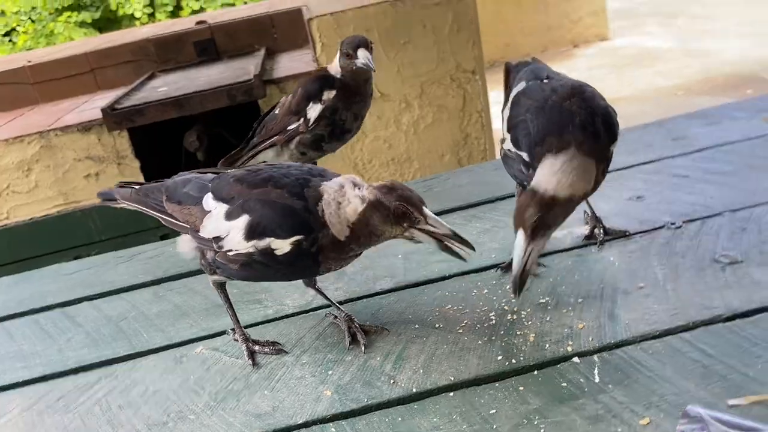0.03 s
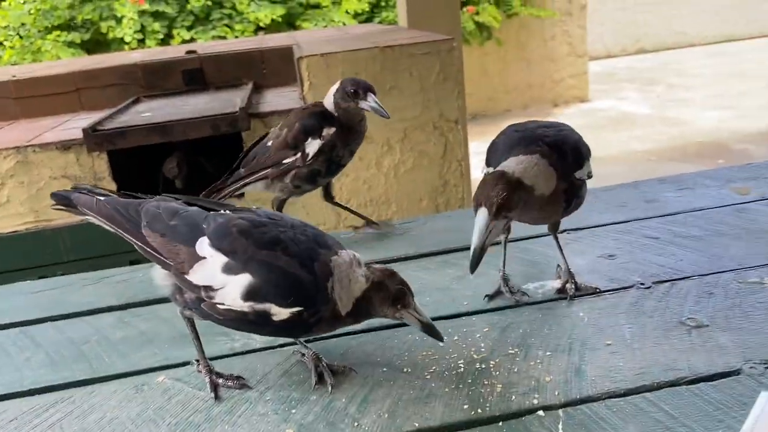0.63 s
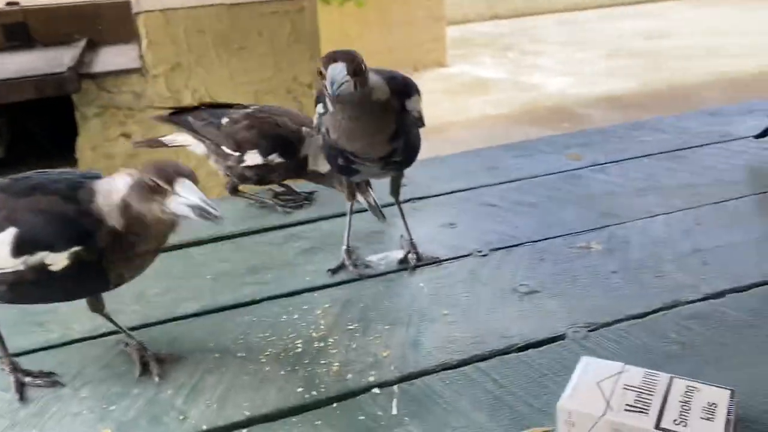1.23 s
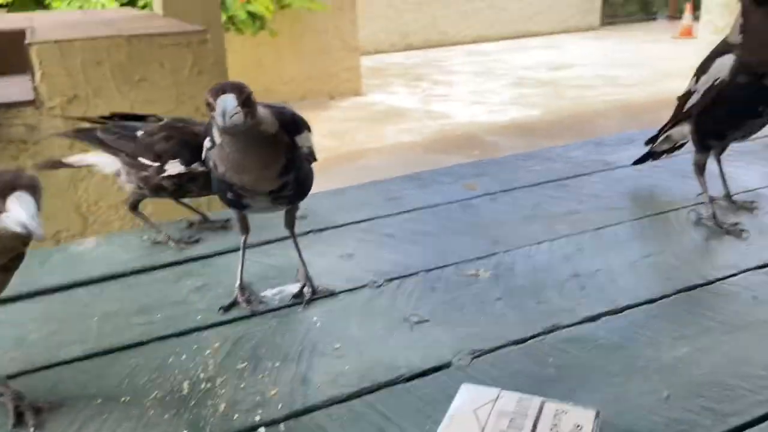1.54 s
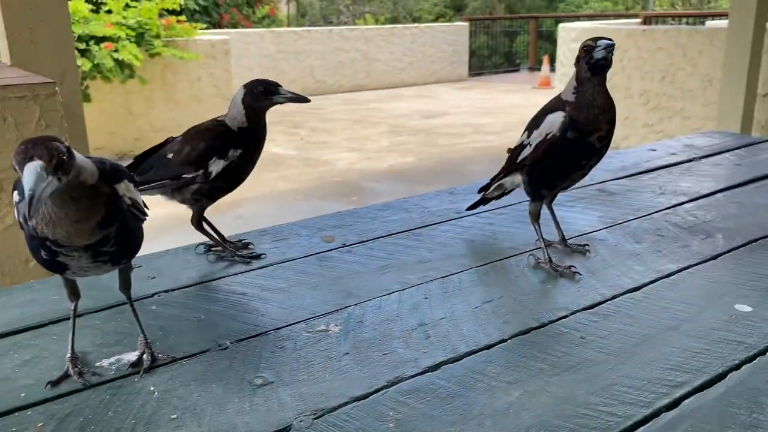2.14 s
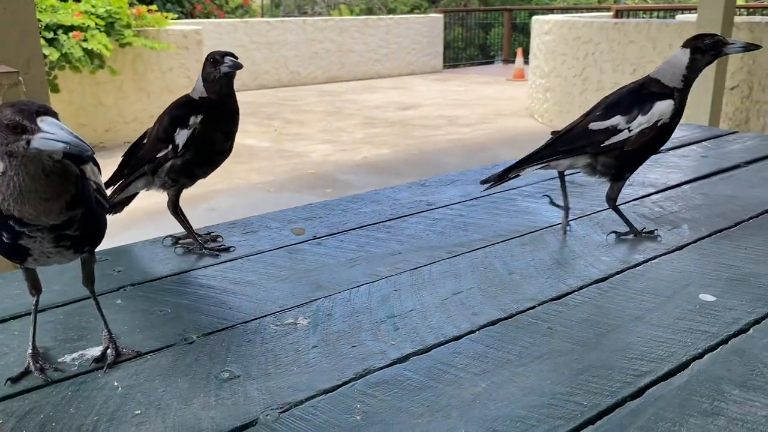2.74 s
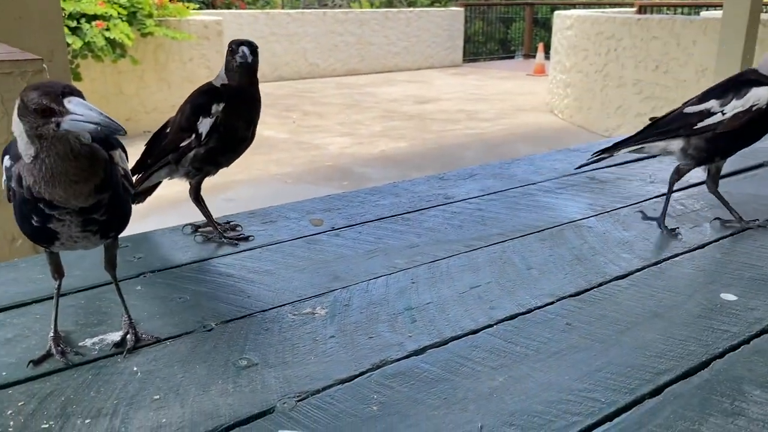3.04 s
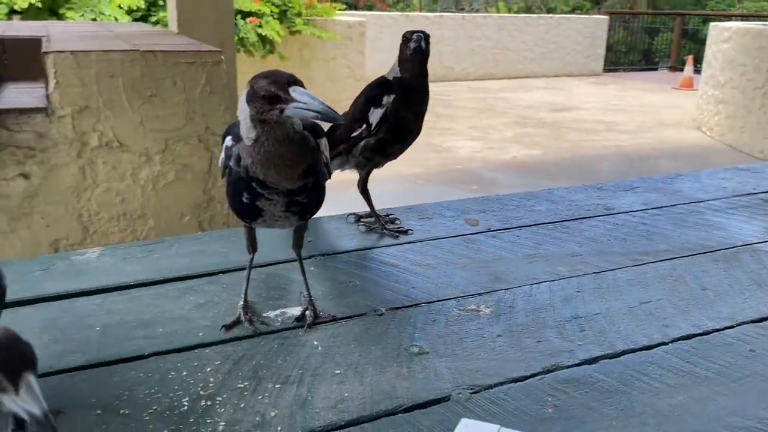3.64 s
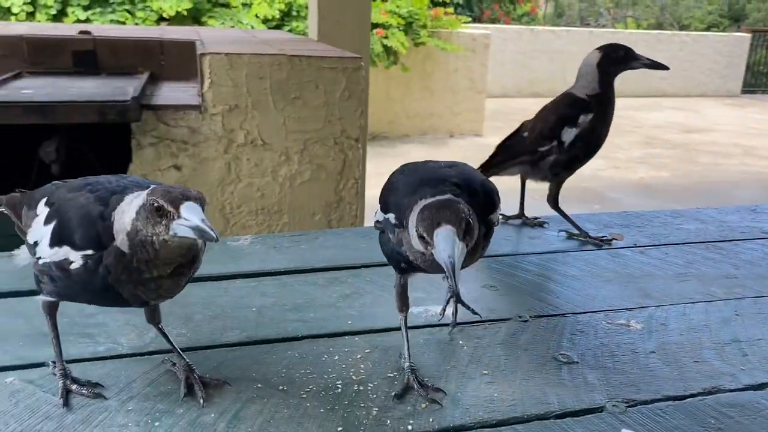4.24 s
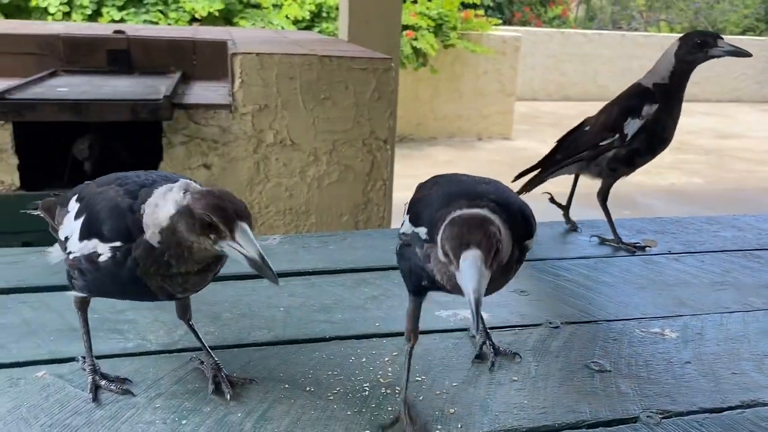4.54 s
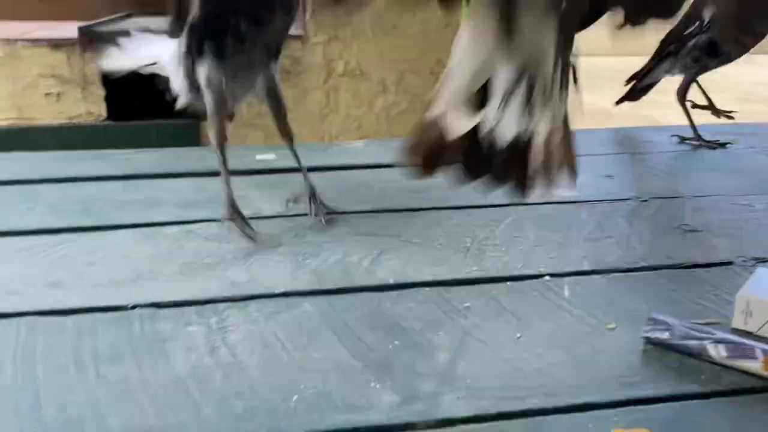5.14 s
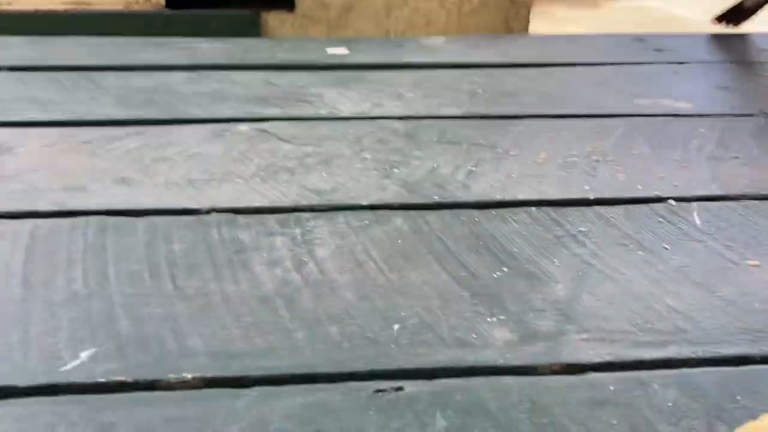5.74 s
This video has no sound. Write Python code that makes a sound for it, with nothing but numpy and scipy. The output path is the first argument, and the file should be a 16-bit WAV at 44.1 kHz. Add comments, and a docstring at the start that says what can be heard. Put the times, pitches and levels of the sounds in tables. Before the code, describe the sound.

Light pecks click on a wooden table on a quiet veranda as young magpies call nearby in bending, nasal whines, some led by a throaty rasp. Fainter answers and a few soft fluting notes come from a distance. Then a brief squabble breaks out against the microphone, with brushing feathers and two ragged screeches, followed by the swish and low thumps of departing wings.

```python
"""On a veranda, young magpies peck crumbs off a wooden table near the microphone and beg with nasal,
arching whines and low rasps, pulses of the syrinx ringing in the throat. Farther off a bird answers,
and faint fluting notes follow. At about five seconds they squabble: feathers rustle and two harsh
squawks burst out right at the microphone. Then wing beats buffet it as the birds take off."""
import sys
import numpy as np
from scipy import signal
from scipy.fft import rfft, irfft
from scipy.io import wavfile
from scipy.ndimage import uniform_filter1d

SR = 44100
rng = np.random.default_rng(int(sys.argv[2]) if len(sys.argv) > 2 else 0)


def transcribe(u):
    """Save the signal u as a 16-bit wav file named by the first command-line argument.

    u: samples, shape (n,) or (channels, n), limited to [-1, 1]; the rate is SR.
    q: integer samples, one column per channel.
    """
    v = np.clip(np.atleast_2d(u).T, -1, 1)
    q = np.round(v * 32767).astype(np.int16)
    wavfile.write(sys.argv[1], SR, q)


N = 263718
T = np.arange(N) / SR
HZ = np.maximum(np.fft.rfftfreq(N, 1 / SR), 1)
TAKE_OFF_S = 5.24


def from_db(db):
    """Decibels to gain."""
    return 10 ** (np.asarray(db) / 20)


def rms_one(x):
    """Scale to unit power."""
    return x / np.sqrt(np.mean(x ** 2) + 1e-20)


def pan(db):
    """Channel gains that put the left db above the right."""
    return from_db(np.array([[db], [-db]]) / 2)


def add(out, s, sound):
    """Mix a sound in at s seconds."""
    i = round(s * SR)
    sound, i = sound[..., max(-i, 0):], max(i, 0)
    out[:, i:i + sound.shape[-1]] += sound[..., :N - i]


def band(x, low_hz, high_hz, order=2):
    """Butterworth band-pass."""
    return signal.sosfilt(signal.butter(order, [low_hz, high_hz], "band", fs=SR, output="sos"), x)


def drift(hz, size):
    """A random wander of spread near 1, up to about hz."""
    knots = rng.standard_normal(int(size * 2 * hz / SR) + 3)
    return np.interp(np.arange(size) * 2 * hz / SR, np.arange(len(knots)), knots)


def resonance(x, hz, width_hz):
    """Two-pole resonance with gain 1 on top."""
    r = np.exp(-np.pi * width_hz / SR)
    poles = [1, -2 * r * np.cos(2 * np.pi * hz / SR), r * r]
    return signal.lfilter(np.array([1, 0, -1]) * (1 - r * r) / 2, poles, x)


def stereo_noise(size, side_db):
    """White noise; the lower side_db, the narrower the image."""
    mid, side = rng.standard_normal((2, size))
    return mid + from_db(side_db) * side * [[1], [-1]]


def coloured(spectrum, side_db):
    """Stereo noise of unit power with a given spectrum."""
    hz, db = np.transpose(spectrum)
    gain = from_db(np.interp(np.log(HZ), np.log(hz), db, left=-90, right=-90))
    return rms_one(irfft(rfft(stereo_noise(N, side_db)) * gain, N))


def at_ports(x, phases):
    """Close sounds reach the microphone's two ports out of step."""
    hz, radians = np.transpose(phases)
    lead = np.interp(np.log(HZ), np.log(hz), radians)
    return irfft(rfft(x) * np.exp(.5j * lead * [[1], [-1]]), N)


def gate(t, fade_s):
    """Soft ends for a call."""
    return np.clip(np.minimum(t, t[-1] - t) / fade_s, 0, 1)


def envelope(t, attack_s, release_s, swell_db=16, fade_db=16.5, bend=2.28):
    """Attack, hold and release, in dB relative to the call's level."""
    rising = np.clip(1 - t / attack_s, 0, 1)
    falling = np.clip(1 - (t[-1] - t) / release_s, 0, 1)
    return -swell_db * rising ** bend - fade_db * falling ** 1.56


# ambience beyond the veranda, before its gains: (time [s], rumble [dB], hiss [dB])
AMBIENCE = [(0.0, -53.5, -66), (0.2, -55.5, -80), (1.78, -67.5, -76.5), (2.63, -68, -83), (3.26, -74, -85),
            (4.6, -73, -79), (5.08, -61, -74), (5.23, -60, -84), (5.46, -62, -71), (5.59, -53.5, -72.5),
            (5.98, -54.5, -87)]
# spectra of its three layers: (frequency [Hz], level [dB])
RUMBLE_SPECTRUM = [(15, -47), (25, -13), (39, -24), (54, 8), (87, -2), (163, -2), (345, -7.5), (394, -13),
                   (450, -11.5), (580, -48), (990, -120)]
AIR_SPECTRUM = [(180, -4.5), (300, -5), (686, -5.5), (804, -3), (1320, -6.5), (1820, -14), (2400, -12.5),
                (2720, -17), (3300, -19), (5500, -28), (7150, -62), (12100, -120)]
HISS_SPECTRUM = [(4000, -37), (6200, -16), (7300, -1.5), (8200, -12.5), (10000, -18), (12000, -12),
                 (16000, -69.5)]
def outdoors(rumble_gain_db=2.0, hiss_gain_db=4.5, air_db=-65, air_follows=0.56):
    """Low rumble, distant air that rises and falls with it, and a thin hiss."""
    times, *levels = np.transpose(AMBIENCE)
    rumble_db, hiss_db = (np.interp(T, times, db) for db in levels)
    rumble = from_db(rumble_db + rumble_gain_db) * coloured(RUMBLE_SPECTRUM, side_db=-14.5)
    swing_db = rumble_db - rumble_db.mean()
    air = from_db(air_db + air_follows * swing_db) * coloured(AIR_SPECTRUM, side_db=0)
    hiss = from_db(hiss_db + hiss_gain_db) * coloured(HISS_SPECTRUM, side_db=-6.5)
    return rumble + air + hiss


def veranda(x, t60_s, split_hz=5000):
    """Dense reflections from the roof and walls around the microphone; the treble dies sooner."""
    t = T[:SR]
    noise = stereo_noise(len(t), side_db=-3.5)
    body = band(noise, 200, split_hz) * from_db(-60 * t / t60_s)
    treble = 0.28 * band(noise, split_hz, 9300) * from_db(-130 * t / t60_s)
    tail = (body + treble) * np.clip(t / 0.0025 - .4, 0, 1)
    return signal.fftconvolve(x, tail / np.sqrt(np.sum(tail ** 2) / 2), axes=1)[:, :N]


def arch(t, top_hz, scoop, top_at=.71, droop=0.0316):
    """The pitch of a whine scoops up to its top and droops a little."""
    progress = t / t[-1]
    before = np.maximum(1 - progress / top_at, 0)
    after = np.maximum((progress - top_at) / (1 - top_at), 0)
    return top_hz * (1 - scoop * before ** 1.9 - droop * after ** 2)


def whine(t, pitch_hz, db, beak, rough, jitter=0.0066, shimmer_db=2.5, breath=0.03):
    """Harmonics on one wavering pitch, shaped by the beak; the note starts hoarse and clears."""
    hoarse = rough + 0.51 * np.linspace(1, 0, len(t)) ** 2
    waver = 1 + jitter * drift(30, len(t)) + .12 * hoarse ** 2 * drift(160, len(t))
    phase = 2 * np.pi * np.cumsum(pitch_hz * waver) / SR
    dull_db = (db.max() - db) / 40   # less effort gives a duller tone
    voice = 0
    for k in range(1, 18):
        rolloff_db = 1.34 * max(k - beak[-1][0], 0)
        level = np.interp(k, *np.transpose(beak)) - rolloff_db - k * dull_db
        flutter = 1 + hoarse * drift(91, len(t))
        gain = from_db(level + shimmer_db * drift(15.1, len(t))) * flutter
        voice += gain * np.sin(k * phase + rng.uniform(0, 2 * np.pi))
    hiss = rms_one(band(rng.standard_normal(len(t)) * (1 + np.cos(phase)), 1000, 6000))
    airy = np.clip(.6 * hoarse ** 1.4, 0, .5)
    call = np.sqrt(1 - airy ** 2) * rms_one(voice) + (airy + breath * hoarse) * hiss
    return call * from_db(db) * gate(t, fade_s=0.002)


# distant fluting notes: (time [s], length [s], first pitch [Hz], last pitch [Hz], level [dB])
WARBLES = [(2.6, 0.21, 1000, 870, -77.5), (3.3, 0.11, 700, 862, -72), (3.41, 0.095, 975, 741, -68)]
# their timbre: (harmonic [number], level [dB])
WARBLE_BEAK = [(1, -1), (2, -10), (3, -28), (5, -45)]
def warbles():
    """Far from the microphone, soft fluting notes slide evenly in pitch."""
    out = np.zeros((2, N))
    for s, length, first_hz, last_hz, db in WARBLES:
        t = T[T < length]
        pitch = np.linspace(first_hz, last_hz, len(t))
        level = db + envelope(t, attack_s=0.061, release_s=.02)
        add(out, s, whine(t, pitch, level, WARBLE_BEAK, rough=.24, jitter=0.027))
    return out


# answering whines: (time [s], length [s], top pitch [Hz], level [dB])
ANSWERS = [(0.717, 0.22, 932, -60.5), (1.657, 0.14, 900, -60.5), (3.568, .16, 937, -67.5)]
# their timbre: (harmonic [number], level [dB])
ANSWER_BEAK = [(1, -9), (2, 3), (3, -1.5), (4, -8.5), (5, -5), (6, -14.5), (8, -35), (12, -55)]
def answers():
    """A bird farther off, a little to the left, answers on a higher note."""
    out = np.zeros((2, N))
    for s, length, top_hz, db in ANSWERS:
        t = T[T < length]
        level = db + envelope(t, attack_s=0.047, release_s=0.05)
        add(out, s, whine(t, arch(t, top_hz, scoop=0.098), level, ANSWER_BEAK, rough=0.17))
    return out * pan(db=3)


# beaks and claws on the table; harder means more tick, less knock: (time [s], level [dB], hardness [dB])
PECKS = [(.302, -49, -9.5), (.541, -49, 2.5), (.821, -46.5, -4), (.831, -42, -5.5), (.841, -47, -8),
         (1.168, -50, 1.5), (1.189, -51, -1), (1.199, -53.5, -9), (1.436, -52, 0.5), (1.635, -58, 3),
         (1.948, -56.5, -1), (2.958, -43.5, -2.5), (3.558, -55, -0.5), (4.043, -55, 2), (4.299, -54, 2.5),
         (4.525, -62.5, 6), (4.811, -48.5, 2.5)]
# modes of a table board: (frequency [Hz], t60 [s], level [dB])
BOARD_MODES = [(693, 0.053, -9), (916, 0.056, -2), (1042, 0.051, -7.5), (1340, 0.018, -1), (1660, 0.02, -7),
               (1990, 0.018, -3.5)]
def pecks(knock_db=-4.5, crack_db=-5.5, tick_db=4, step_count=33, step_db=-65, step_hardness_db=1):
    """A hard tip clicks on a board and sets it ringing; faint claw steps fall at random until take-off."""
    out, t = np.zeros((2, N)), T[:SR // 8]
    steps = [(rng.uniform(0, TAKE_OFF_S), step_db, step_hardness_db) for _ in range(step_count)]
    for s, level, hardness in PECKS + steps:
        wood = 0
        for hz, t60, db in BOARD_MODES:
            mode = np.sin(2 * np.pi * hz * rng.normal(1, 0.042) * t) * rng.choice([-1, 1])
            wood += from_db(db - 60 * t / t60) * mode
        crack = rms_one(band(stereo_noise(len(t), side_db=-6.5), 1600, 4400)) * np.exp(-t / 0.0036)
        tick = rms_one(band(stereo_noise(len(t), side_db=1.5), 7300, 13800)) * np.exp(-t / 0.0024)
        click = from_db(crack_db) * crack + from_db(tick_db + hardness) * tick
        add(out, s, from_db(level) * (from_db(knock_db - hardness) * wood + click))
    return out


# two soft low thumps, then air on the microphone from wing strokes: (time [s], level [dB], width [s])
GUSTS = [(2.565, -55.5, .027), (2.66, -60, .02), (5.12, -35.5, 0.016), (5.185, -20, 0.0042),
         (5.446, -31.5, .006), (5.474, -29, 0.021), (5.545, -34.5, 0.006), (5.6, -39.5, 0.015),
         (5.651, -34.5, 0.0064), (5.723, -32.5, 0.007), (5.762, -31, .017), (5.89, -42, 0.011)]
def gusts(wake_lag_s=0.0167, wake_db=-10, wake_stretch=2.3):
    """Two soft low thumps sound, then lumps of turbulent air pass over the microphone; each trails a weaker,
    longer wake."""
    out, t = np.zeros((2, N)), T[:SR // 4]
    middle = t[-1] / 2
    wakes = [(s + wake_lag_s, db + wake_db, width * wake_stretch) for s, db, width in GUSTS]
    for s, db, width in GUSTS + wakes:
        top_hz = 314 * 2 ** ((db + 30) / 12)   # an octave brighter for each 12 dB
        swell = np.exp(-((t - middle) / width) ** 2 / 2)
        puff = band(stereo_noise(len(t), side_db=-20.5), 0.17 * top_hz, top_hz, order=3) * swell
        add(out, s - middle, from_db(db) * rms_one(puff) * np.sqrt(np.mean(swell ** 2)))
    return out * pan(db=-1)


# air around the wings: (frequency [Hz], level [dB])
SWISH_SPECTRUM = [(290, -49), (500, -37), (766, -1.5), (832, -6), (1080, -1), (1460, -13), (2350, -8.5),
                  (2560, -11), (3250, -16), (4920, -19.5), (6000, -20.5), (7800, -19), (13200, -120)]
def flight(db=-59.5, swell_db=7, flutter_db=2.1, pass_s=5.51, pass_width_s=0.076):
    """Air swishes from take-off on and swells as the birds pass the microphone."""
    passing = np.exp(-((T - pass_s) / pass_width_s) ** 2 / 2)
    airborne = np.clip((T - TAKE_OFF_S) / .03, 0, 1)
    level = db + swell_db * passing + flutter_db * drift(40, N)
    return from_db(level) * airborne * coloured(SWISH_SPECTRUM, side_db=-6.5)


# brushing feathers: (peak time [s], level [dB], rise [s], decay [s])
FLURRIES = [(4.96, -35.5, 0.013, 0.09), (5.07, -37, 0.094, 0.047), (5.169, -38.5, 0.0045, 0.017),
            (5.5, -47.5, 0.25, 0.77)]
# wing tips and claws: (time [s], level [dB], decay [s])
FLICKS = [(4.907, -37.5, 0.0099), (4.946, -35.5, 0.015), (5.044, -28, 0.0063), (5.0784, -22, 0.0019),
          (5.0905, -37, 0.0017), (5.554, -22, 0.014)]
# spectrum of both: (frequency [Hz], level [dB])
FEATHER_SPECTRUM = [(880, -5.5), (1500, -15), (4970, -5), (6370, -6.5), (7760, -4), (9010, 16), (9750, -1),
                    (11300, 5.5), (12900, -2), (14900, 1), (16000, 5)]
# port phase of sounds right at the microphone: (frequency [Hz], left lead [rad])
CLOSE_PHASE = [(90, 0), (250, -1.5), (550, -2.17), (1100, -1.03), (3000, -1.1), (6000, -1.1), (11000, -1.9),
               (16000, -2.2)]
def feathers(grain_db=2.5, clump_db=2.0):
    """Right at the microphone, feather barbs rub in grains, wing tips flick and claws scratch."""
    flurries = sum(from_db(db) * np.exp(-np.maximum((s - T) / rise, (T - s) / decay))
                   for s, db, rise, decay in FLURRIES)
    grains = from_db(grain_db * drift(230, N) + clump_db * drift(25, N))
    rustle = flurries * grains * (T > FLICKS[0][0])
    flicks = sum(from_db(db) * np.exp(-np.abs(T - s) / decay) * (T >= s) for s, db, decay in FLICKS)
    return at_ports((rustle + flicks) * coloured(FEATHER_SPECTRUM, side_db=-23), CLOSE_PHASE)


def croak(t, rate_hz, db, throat, jitter, puff_s, puff_share, even_s, throb, uneven_db=2.5):
    """Uneven slaps of the syrinx, each with a puff of air, ring in the throat."""
    cycles = np.cumsum(rate_hz * np.exp(jitter * drift(70, len(t)))) / SR
    slaps = np.diff(np.floor(cycles), prepend=-1) * from_db(uneven_db * drift(120, len(t)))
    puffs = signal.lfilter([1], [1, -np.exp(-1 / (puff_s * SR))], slaps) * rng.standard_normal(len(t))
    source = rms_one(slaps) + puff_share * rms_one(puffs)
    voice = sum(from_db(level) * resonance(resonance(source, hz, 1.16 * width), hz, 1.16 * width)
                for hz, width, level in throat)
    voice *= 1 - throb * np.cos(2 * np.pi * cycles + np.pi / 4)
    window = int(even_s * SR)   # the loudness is evened out over this span
    power = uniform_filter1d(uniform_filter1d(voice ** 2, window), window)
    return voice / np.sqrt(np.maximum(power, 1e-12)) * from_db(db) * gate(t, fade_s=0.0015)


# low rasps: (time [s], length [s], pulse rate [Hz], level [dB])
RASPS = [(0.439, 0.18, 75.4, -44), (2.109, 0.15, 58, -45.5), (4.362, 0.21, 58, -51)]
# throat resonances, one list a rasp: (frequency [Hz], nominal width [Hz], level [dB])
RASP_THROATS = [
    [(536, 210, 2.5), (770, 154, 6), (908, 110, 0), (1320, 310, -7), (2660, 710, -18), (6530, 710, -19.5)],
    [(438, 52, -3), (630, 100, -12), (770, 170, 1.5), (1340, 460, -10.5), (3830, 700, -21.5)],
    [(572, 65, -0.5), (750, 210, -8), (853, 90, 5.5), (1300, 270, -12), (3050, 2100, -26)],
]
def rasps(attack_s=0.048, release_share=0.3):
    """On the table, slow, throbbing pulses of the syrinx lead into some of the whines."""
    out = np.zeros((2, N))
    for (s, length, rate, db), throat in zip(RASPS, RASP_THROATS):
        t = T[T < length]
        level = db + envelope(t, attack_s, release_share * length)
        rasp = croak(t, rate, level, throat, jitter=.1, puff_s=.007, puff_share=1.2, even_s=.03, throb=.6)
        add(out, s, rasp)
    return out


# the beak's opening for each whine: (harmonic [number], level [dB])
BEAK_1 = [(1, -1), (2, 1.5), (3, -14.5), (4, -4.5), (5, -11), (6, -6.5), (7, -16), (8, -9.5), (9, -15),
          (10, -12)]
BEAK_2 = [(1, 3), (2, -1.5), (3, -25), (4, -11), (5, -18), (6, -16), (7, -36), (8, -26), (9, -24.5),
          (10, -21)]
BEAK_3 = [(1, -16), (2, 4.5), (3, -10), (4, 2.5), (5, -4), (6, -4.5), (7, -6), (8, -10), (9, -12),
          (10, -10)]
BEAK_4 = [(1, -0.5), (2, 2.5), (3, -8.5), (4, -4.5), (5, -8), (6, -4), (7, -12), (8, -16), (9, -15),
          (10, -6)]
BEAK_5 = [(1, -10.5), (2, 1.5), (3, -5), (4, 1.5), (5, -1), (6, -5), (7, -4.5), (8, -14), (9, -22),
          (10, -2.5)]
BEAK_6 = [(1, 2), (2, 1), (3, -2.5), (4, 0.5), (5, -2), (6, -7), (7, -4.5), (8, -15), (9, -5), (10, 0.5)]
BEAK_7 = [(1, -6), (2, 2.5), (3, -5), (4, 0), (5, -4), (6, -8), (7, -8), (8, -20), (9, -11), (10, -7)]
# begging whines: (time [s], length [s], top pitch [Hz], scoop [share of pitch], level [dB], attack [s],
# release [s], left over right [dB], roughness [0-1], beak [table])
WHINES = [(-.11, .25, 842.5, 0.15, -38, .08, 0.089, -1.0, 0.22, BEAK_1),
          (0.504, 0.26, 779, 0.2, -41.5, 0.1, 0.026, 0, .14, BEAK_2),
          (1.455, .21, 722.4, .11, -45.5, 0.17, 0.041, 3.5, 0.06, BEAK_3),
          (2.148, .24, 750.4, .17, -52.5, 0.081, 0.04, 2.5, 0.08, BEAK_4),
          (2.757, .23, 723.5, .15, -57.5, 0.17, 0.046, 2.5, .18, BEAK_5),
          (3.699, 0.33, 761.8, .2, -51, 0.28, 0.094, 1.5, 0.23, BEAK_6),
          (4.558, 0.3, 776.3, 0.24, -52.5, 0.16, 0.077, 1.5, 0.2, BEAK_7)]
def begging():
    """The young birds on the table whine in arches, the beak opening differently each time."""
    out = np.zeros((2, N))
    for s, length, top_hz, scoop, db, attack, release, pan_db, rough, beak in WHINES:
        t = T[T < length]
        level = db + envelope(t, attack, release)
        add(out, s, whine(t, arch(t, top_hz, scoop), level, beak, rough) * pan(pan_db))
    return out


# harsh squawks: (time [s], length [s], level before filtering [dB], attack [s], release [s],
# pulse rate in the attack [Hz], pulse rate afterwards [Hz])
SQUAWKS = [(5.007, 0.13, -10.5, .056, 0.05, 145, 190), (5.166, 0.1, -10, .016, 0.045, 310, 116)]
# throat resonances, one list a squawk: (frequency [Hz], nominal width [Hz], level [dB])
SQUAWK_THROATS = [
    [(172.6, 58, -5), (520, 330, -7), (943, 128, 2), (1667, 320, 1), (2317, 260, -0.5), (4230, 210, -12.5),
     (5730, 1300, -25)],
    [(235, 220, -11), (650, 320, -11), (1088, 124, 6), (1900, 335, 6), (2570, 178, 2.5), (3630, 240, -14),
     (6110, 170, -22)],
]
def squawks(depth_db=37.5, sag_db_per_s=107, settle_s=.014):
    """Two ragged screeches just right of the microphone; the pulse rate settles and the level sags."""
    out = np.zeros((2, N))
    for (s, length, db, attack, release, first_hz, later_hz), throat in zip(SQUAWKS, SQUAWK_THROATS):
        t = T[T < length]
        rate = np.interp(t, [attack, attack + settle_s], [first_hz, later_hz])
        sag_db = sag_db_per_s * np.maximum(t - attack, 0)
        level = db + envelope(t, attack, release, depth_db, depth_db, bend=0.74) - sag_db
        voice = croak(t, rate, level, throat, jitter=.22, puff_s=.004, puff_share=.8, even_s=.008, throb=0)
        add(out, s, band(voice, 100, 5500, order=1))
    return out * pan(db=-2.5)


# notches in the treble: (frequency [Hz], width [Hz], gain [dB])
TREBLE_DIPS = [(8977, 813, -67), (12900, 700, -25)]
def hollow(x):
    """The treble has two narrow dips."""
    gain_db = sum(db * np.exp(-(2 * (HZ - hz) / width) ** 2) for hz, width, db in TREBLE_DIPS)
    return irfft(rfft(x) * from_db(gain_db), N)


# port phase of calls from the table: (frequency [Hz], left lead [rad])
TABLE_PHASE = [(300, 0.24), (750, 1.47), (1500, 1.14), (2500, 0.88), (5000, 0.58), (9000, 1.56)]
def scene():
    """The veranda from the microphone's place: the nearer a bird is, the drier it sounds."""
    calls = at_ports(begging() + rasps(), TABLE_PHASE)
    far = answers() + warbles()
    near = at_ports(squawks(), CLOSE_PHASE)
    taps = pecks()
    to_walls = from_db(-7) * calls + from_db(-6.5) * far + from_db(-10) * taps
    reflections = veranda(to_walls, t60_s=0.37) + veranda(from_db(-41) * near, t60_s=0.54)
    birds = calls + far + near + taps + feathers() + flight()
    return hollow(birds + reflections + outdoors()) + gusts()


def record(dry, ceiling=1.5, cutoff_hz=16200):
    """Peaks are rounded and the highest treble is cut."""
    low_pass = signal.ellip(10, .1, 80, cutoff_hz, fs=SR, output="sos")
    return signal.sosfilt(low_pass, ceiling * np.tanh(dry / ceiling))


dry = scene()
out = record(dry)
transcribe(out)
```